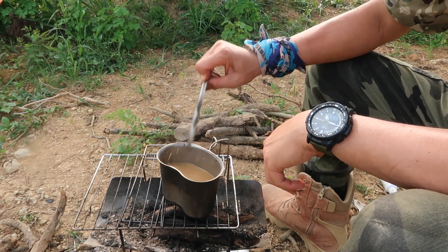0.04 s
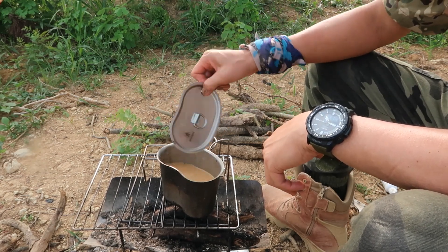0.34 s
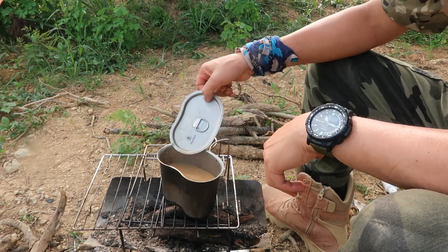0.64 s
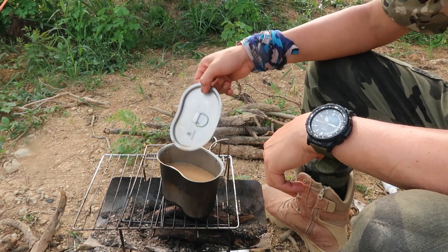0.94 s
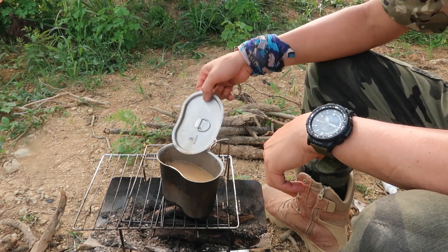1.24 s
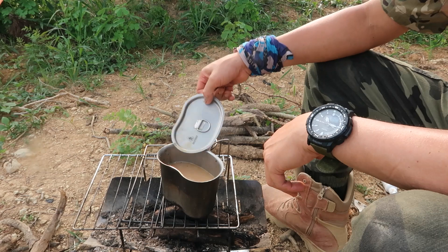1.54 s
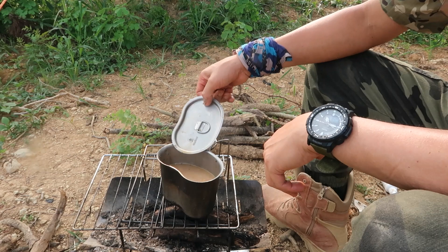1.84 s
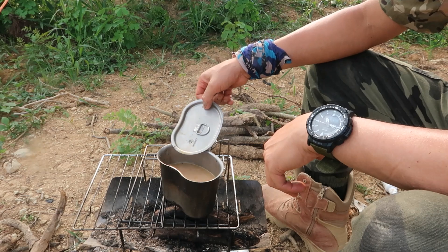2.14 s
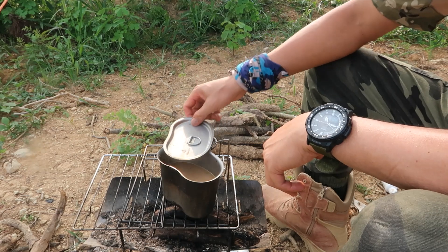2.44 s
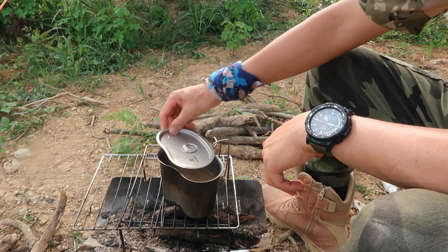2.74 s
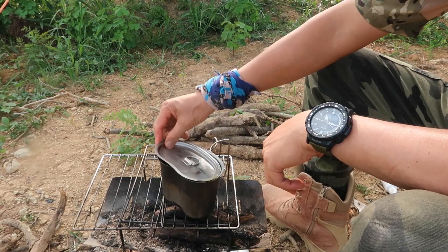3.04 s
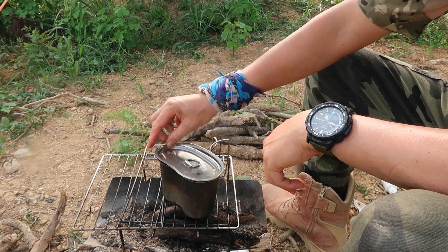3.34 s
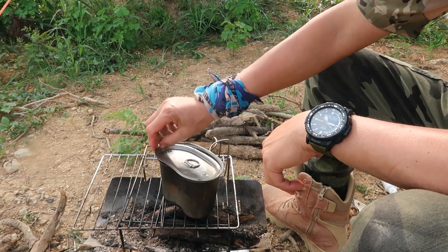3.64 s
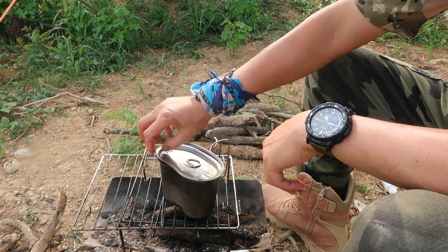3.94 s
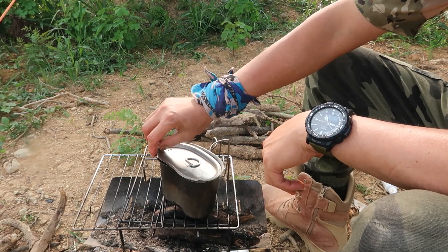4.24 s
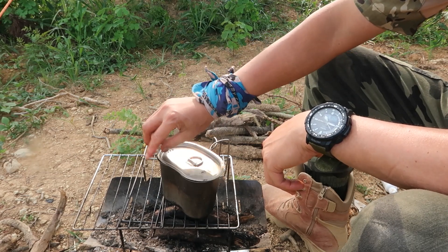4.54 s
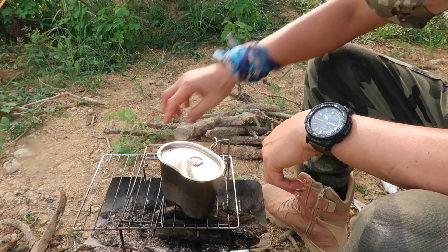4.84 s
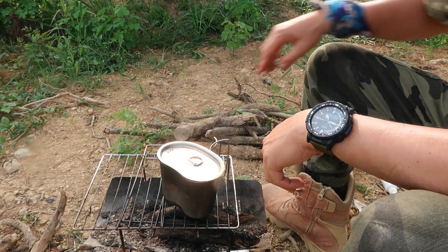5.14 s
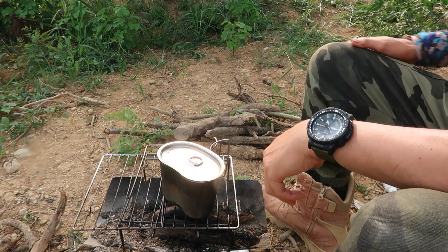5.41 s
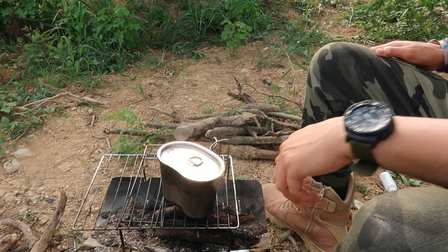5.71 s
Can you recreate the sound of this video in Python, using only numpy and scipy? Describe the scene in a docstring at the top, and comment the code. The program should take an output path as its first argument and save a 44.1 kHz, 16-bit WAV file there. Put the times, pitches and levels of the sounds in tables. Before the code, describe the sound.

Low wind rumbles on the microphone over a steady outdoor hiss throughout. Close by, a thin metal lid is tapped on the rim of a camp cup four times, at about 0.1, 0.5, 1.2 and 1.5 seconds. Each tap is a sharp clink with a short, chattering ring, and faint ticks follow some of them. From about 2 seconds the lid slides across the rim with a rasp and a few brief metallic squeaks, while gusts thump on the microphone until around 3.4 seconds. The lid knocks and scrapes onto the cup between 2.8 and 3.2 seconds, and shifts with lighter knocks near 3.9. From 4.3 to 4.5 seconds it scrapes and clatters shut, its hollow tone falling as the gap closes. From about 5.2 to 5.8 seconds a sleeve rustles softly under a little more wind.

```python
"""Wind rumbles on the microphone over a steady hiss, and at once a thin metal lid is tapped on a camp cup.
Four taps excite its bending modes, each chattering on the rim. The lid slides across with a frictional
rasp, then knocks and scrapes shut; the air resonance beneath it falls as the gap closes.
A sleeve rustles as the arm draws back. Gain control ducks after the loud taps and creeps back."""
import sys
import numpy as np
from scipy import signal
from scipy.fft import rfft, irfft
from scipy.io import wavfile
from scipy.ndimage import uniform_filter1d

SR = 44100
rng = np.random.default_rng(int(sys.argv[2]) if len(sys.argv) > 2 else 0)


def waveform_to_disk(signal):
    """Save audio, clipped to [-1, 1], as 16-bit WAV at the path in sys.argv[1]."""
    frames = np.transpose(np.atleast_2d(signal))
    scaled = np.clip(frames, -1, 1) * 32767
    samples = np.round(scaled).astype(np.int16)
    wavfile.write(sys.argv[1], SR, samples)


N = 254449
TIME = np.arange(N) / SR
RING = TIME[:SR // 3]  # time axis of one transient


def amp(db):
    """Amplitude ratio of a level in decibels."""
    return 10 ** (np.asarray(db) / 20)


def rms(x):
    """Root-mean-square amplitude."""
    return np.sqrt(np.mean(x ** 2) + 1e-20)


def spectrum(points, size):
    """Log-frequency interpolation of a table onto the Fourier bins of size samples."""
    hz, value = np.transpose(points)
    return np.interp(np.log(np.fft.rfftfreq(size, 1 / SR) + 1), np.log(hz + 1), value)


def noise(colour, size):
    """Spectral shaping: Gaussian noise of unit rms from rows of f/Hz, level/dB."""
    x = irfft(rfft(rng.standard_normal(size)) * amp(spectrum(colour, size)), size)
    return x / rms(x)


def add(mix, s, sound):
    """Superposition of a sound on the mix from time s."""
    part = mix[..., max(round(s * SR), 0):][..., :sound.shape[-1]]
    part += sound[..., :part.shape[-1]]


def cut(x, hz, kind, order=4):
    """Causal Butterworth filtering."""
    return signal.sosfilt(signal.butter(order, hz, kind, fs=SR, output="sos"), x)


def resonate(x, hz, width):
    """Forced response of a resonator whose frequency follows the curve hz; bandwidth in Hz."""
    turn = np.exp(2j * np.pi * np.cumsum(hz) / SR)
    pole = np.exp(-np.pi * width / SR)
    return 2 * (turn * signal.lfilter([1 - pole], [1, -pole], x / turn + 1e-18)).real


def clicks(size, per_s, spread_db):
    """Poisson impulses: tiny contacts of uneven force."""
    force = amp(spread_db * np.minimum(rng.exponential(1, size), 3)) * rng.choice([-1, 1], size)
    return force * (rng.random(size) < per_s / SR)


def stroke(s, swell, fade):
    """Gaussian envelope of a hand movement, 20 dB down at times s - swell and s + fade."""
    away = (TIME - s) / np.where(TIME < s, swell, fade)
    return amp(-20 * np.minimum(away ** 2, 10))


# Strength of the breeze: t/s, level/dB
GUSTS = [(0, -48.5), (.65, -52), (1.1, -41.5), (1.6, -45.5), (1.85, -27.5), (1.93, -43), (2.2, -27),
         (2.34, -38.5), (2.86, -30.5), (2.97, -45.5), (3.1, -48.5), (3.23, -23), (3.38, -44), (5.05, -42.5),
         (5.3, -33), (5.46, -43.5), (5.56, -29), (5.77, -48)]
# Spectrum of the turbulent pressure: f/Hz, level/dB
WIND_SPECTRUM = [(12, -32), (20, -4), (49, 5.5), (70, 2), (125, -1), (288, -24), (372, -23.5), (474, -23),
                 (500, -27), (650, -48.5), (1100, -120)]
# Strongest eddies: t/s, level/dB, f/Hz, left minus right/dB
EDDIES = [(1.992, -22, 141, -5.5), (2.123, -24.5, 96, -7), (2.21, -21, 114, -9), (2.553, -25, 85, -4),
          (2.661, -22, 51, 2), (2.716, -25, 63, -4), (2.807, -26.5, 112, 0), (2.858, -21, 95, 3),
          (3.147, -24.5, 68.6, -4.5), (3.203, -18.5, 108, 2), (3.224, -18, 116, -12), (3.298, -26, 69.5, 2),
          (3.326, -19.5, 147, 5.5), (3.744, -30, 55, 2.5), (3.856, -27.5, 71, 1.5), (4.181, -30.5, 63.6, 3),
          (5.25, -26.5, 76, -0.5)]
def wind():
    """Turbulent pressure rumbles and thumps; the smaller the eddy, the less the two ports agree."""
    rumble = cut(noise(WIND_SPECTRUM, N), 590, "low")
    swirl = cut(noise(WIND_SPECTRUM, N), [95, 350], "band", order=2)
    gust = amp(np.interp(TIME, *np.transpose(GUSTS)))
    swirl *= amp(-6.5) * (gust / gust.max()) ** .25
    rumble *= amp(-3) * (gust / gust.max()) ** -.2  # the low rumble swells less steeply than the gusts
    lumps = amp(0.9 * noise([(1, -5), (6, 3.5), (14, -10.5), (40, -40.5), (200, -120)], N))
    out = (rumble + np.array([swirl, -swirl])) * gust * lumps
    ports = np.array([[.5], [-.5]])
    flutter_spectrum = [(60, -6.5), (170, 2.5), (280, -5.5), (450, -30), (900, -78)]
    for s, db, hz, pan_db in EDDIES:
        turns = RING * hz
        lag_rad = min((hz / 95) ** 2, 2.3)
        swell = turns * np.exp(1 - turns / 0.41) / 0.21
        flutter = amp(-12) * np.array([noise(flutter_spectrum, len(RING)) for _ in ports])
        pressure = np.sin(2 * np.pi * turns + ports * lag_rad) + flutter
        add(out, s, amp(db + ports * pan_db) * swell * pressure)
    return out


# Spectrum of the outdoor hiss: f/Hz, level/dB
HISS_SPECTRUM = [(120, -30), (200, -1.5), (299, -6.5), (334, -2.5), (373, -7), (722, -11), (851, -11.5),
                 (1120, -16.5), (1270, -16), (4770, -27), (13300, -41.5), (16000, -71.5)]
# Likeness of left and right: f/Hz, correlation (negative values count as zero)
HISS_CORRELATION = [(60, 0.9), (180, 0.89), (550, 0.81), (1650, 0.65), (4970, -0.059), (15000, -0.78)]
def hiss():
    """Partly coherent noise, wider towards the treble, with a faint narrow-band whine."""
    correlation = np.clip(spectrum(HISS_CORRELATION, N), 0, 1)
    mid, side = (rfft(cut(noise(HISS_SPECTRUM, N), 12500, "low", order=6)) for _ in range(2))
    mid = irfft(mid * np.sqrt((1 + correlation) / 2), N)
    side = irfft(side * np.sqrt((1 - correlation) / 2), N)
    whine = resonate(rng.standard_normal(N), np.full(N, 13050), width=25)
    return amp(-50) * np.array([mid + side, mid - side]) + amp(-84) * whine / rms(whine)


# Spectrum of the metal's dense, short-lived modes: f/Hz, level/dB
CLANG = [(150, -36), (400, -18), (560, -31), (700, -2.5), (850, 4.5), (1200, 0.5), (2300, 3), (3600, -6),
         (4800, -15), (6200, -11), (8500, -27.5), (10500, -17), (13800, -23), (16000, -34.5)]
def metal(modes, clang_db, clang_t60, t60_scale=1):
    """Modal superposition: an impulse response of damped sinusoids over a decaying noisy clang."""
    hz, db, t60 = np.transpose(modes)[:, :, None]
    signs = (-1) ** np.arange(len(hz))[:, None]
    partials = signs * amp(db - 60 * RING / (t60 * t60_scale)) * np.sin(2 * np.pi * hz * RING)
    clang = noise(CLANG, len(RING)) * amp(clang_db - 60 * RING / (clang_t60 * t60_scale))
    return partials.sum(0) + clang


def voiced(x, edges, bands_db, span):
    """Band equalisation: each band of a blow takes its given level over the first span seconds."""
    hz = np.fft.rfftfreq(2 * len(x), 1 / SR)
    lowpasses = [0 * hz] + [1 / (1 + (hz / edge) ** 30) for edge in edges] + [1 + 0 * hz]
    bands = irfft(rfft(x, 2 * len(x)) * np.diff(lowpasses, axis=0))[:, :len(x)]
    early = np.clip((span - RING) * 1000, 0, 1)
    early_rms = np.sqrt(bands ** 2 @ early / early.sum())
    return amp(bands_db) / early_rms @ bands


# Modes of the lid held by its tab: f/Hz, level/dB, T60/s
HELD_MODES = [(447, -21, .1), (748, -13, .09), (907, 1, .24), (1010, -13, .08), (1290, -17, .12),
              (1410, -13, .1), (1522, -2, .14), (1550, -7, .14), (1722, -2, .15), (2168, 2, .14),
              (2355, -6, .11), (2520, -11, .1), (2699, -2, .12), (2797, -3, .1), (3130, -9, .09),
              (3500, -3, .095), (3675, -9, .1), (3945, -5, .085), (4108, -8, .08), (4760, -19, .09),
              (5625, -16, .09), (5860, -17, .09), (6200, -16, .08), (7020, -20, .09), (7905, -21, .09),
              (9720, -22, .08), (11130, -21, .08), (12300, -22, .08), (13610, -16, .08)]
# Bands of a tap: centre f/Hz, level/dB
TAP_BANDS = [(900, -8.5), (1650, -4.5), (2250, -7.5), (2800, -5), (3800, -10), (6500, -19), (11200, -22)]
# Edges between those bands: f/Hz
TAP_EDGES = [1200, 2000, 2500, 3200, 5000, 8500]
# Four taps and two rebounds: t/s, level/dB, tilt/(dB/octave), favoured f/Hz, muted f/Hz, muting/dB,
# bell-tone lift/dB, chatter duration/s, chatter level/dB, chatter decay/(dB/s)
TAPS = [(0.1215, -3.5, -4.5, 1460, 2750, 14, 1, 0.041, -9.5, 286),
        (0.451, -11, -0.2, 2720, 2180, 1.5, -3.5, 0.044, -5, 205),
        (0.523, -27, 1, 2800, 2170, -2, -5, 0.016, 9, 152),
        (1.1654, -4.5, 2, 2224, 1300, 4, 1, 0.051, -5, 199),
        (1.229, -16.5, -0.8, 2230, 1300, 5, -3, 0.042, -13, 196),
        (1.5397, -1, 1.5, 2240, 2880, 1.5, -3, 0.073, -11.5, 120)]
def taps():
    """Impact excitation: the contact point favours one pitch and mutes another; the lid then chatters."""
    out = np.zeros(N)
    centre_hz, colour_db = np.transpose(TAP_BANDS)
    hz, mode_db, t60 = np.transpose(HELD_MODES)
    bell_hz, reach_octaves = 907, 0.19  # lowest strong mode; reach of favouring and muting
    for s, db, tilt, favoured_hz, muted_hz, muting_db, bell_db, length, chatter_db, decay in TAPS:
        grip = 1 + rng.uniform(-.001, .003, len(hz))  # the fingers detune the modes
        boost_db = 5 * np.exp(-((hz - favoured_hz) / 70) ** 2) + bell_db * (hz == bell_hz)
        modes = np.column_stack([hz * grip, mode_db + boost_db, t60])
        cutoff = np.exp(-np.maximum(RING - length, 0) / 0.013)  # the buzzing ring cuts off quickly
        contacts = clicks(len(RING), per_s=1500, spread_db=2) * cutoff * amp(chatter_db - decay * RING)
        damped = metal(modes, clang_db=7.5, clang_t60=0.038, t60_scale=0.34)  # contact deadens the metal
        chatter = amp(-10) * signal.fftconvolve(contacts, damped)[:len(RING)]
        crack = noise(CLANG, len(RING)) * amp(13 + 0.5 * db - 60 * RING / 0.011)  # hard blows crack more
        blow = crack + metal(modes, clang_db=7.5, clang_t60=0.025, t60_scale=0.74) + chatter
        blow *= 1 - np.exp(-RING / (.0003 * amp(-.55 * db)))  # a light rebound builds up more slowly
        favoured = np.exp(-(np.log2(centre_hz / favoured_hz) / reach_octaves) ** 2)
        muted = np.exp(-(np.log2(centre_hz / muted_hz) / reach_octaves) ** 2)
        bands_db = db + colour_db + tilt * np.log2(centre_hz / 2000) + 3.5 * favoured - muting_db * muted
        add(out, s, voiced(cut(blow, 440, "high", order=2), TAP_EDGES, bands_db, span=0.0083))
    return out


# Modes of the lid's wire tab: f/Hz, level/dB, T60/s
TAB_MODES = [(2330, 0, .12), (2376, -3, .09), (2940, -6.5, 0.096), (3600, -11.5, .06), (6090, -7.5, 0.054),
             (6350, -14, .05)]
# Ticks of the tab: t/s, peak level/dB
TICKS = [(0.196, -30.5), (1.3054, -38.5), (1.374, -38.5), (1.4424, -43.5), (1.675, -38), (1.7384, -40.5)]
def tab_ticks():
    """Free vibration of the wire tab after light contacts."""
    out = np.zeros(N)
    for s, db in TICKS:
        tick = cut(metal(TAB_MODES, clang_db=5.5, clang_t60=.04), 7500, "low")
        tick *= 1 - np.exp(-RING / 0.0019)
        add(out, s, amp(db) * tick / abs(tick).max())
    return out


def friction(body):
    """Convolution of slipping contacts with an impulse response: lower band and treble, unit rms each."""
    x = signal.fftconvolve(clicks(N, per_s=1800, spread_db=4), body)[:N]
    low, high = cut(x, 3960, "low"), cut(x, 4800, "high")
    return low / rms(low), high / rms(high)


# Spectrum of edge rubbing on rim: f/Hz, level/dB
RASP = [(400, -36), (900, -2), (1500, -7), (2200, 5), (3000, -3.5), (3700, -10), (4100, -11), (4600, -20),
        (5500, -31), (6200, -7.5), (8000, -24.5), (13500, -19), (16000, -33)]
# Resonances of the rim: f/Hz, bandwidth/Hz, level re rasp/dB
RIM_TONES = [(920, 45, 0), (1290, 40, -5), (1673, 79, -5.5), (2110, 120, -2), (3140, 760, -12),
             (4070, 83, -15)]
# Gliding strokes: peak t/s, swell/s, fade/s, level/dB
SLIDES = [(.66, .12, 0.084, -56), (0.869, 0.037, 0.043, -53.5), (2.03, 0.049, 0.066, -56.5),
          (2.19, 0.077, 0.12, -55.5), (2.369, 0.17, 0.13, -41), (2.76, 0.2, 0.13, -47.5)]
def slides():
    """Sliding friction: the gliding edge rasps and drives the resonances of the rim."""
    contact = noise(RASP, len(RING)) * amp(-60 * RING / 0.025)
    rasp, treble = friction(contact + amp(-34.5) * metal(HELD_MODES, clang_db=7.5, clang_t60=0.028))
    rubbing = rasp + amp(-25) * treble
    for hz, width, db in RIM_TONES:
        steady = np.full(N, hz)
        tone = resonate(resonate(rng.standard_normal(N), steady, width), steady, width)
        rubbing += amp(db) * tone / rms(tone)
    return rubbing * sum(amp(db) * stroke(s, swell, fade) for s, swell, fade, db in SLIDES)


# Catches of the edge: peak t/s, duration/s, f/Hz, level/dB
SQUEALS = [(2.18, .09, 931, -49), (2.3, .13, 920, -39), (2.354, .13, 1290, -46.5),
           (2.403, 0.13, 2110, -36.5), (2.418, 0.077, 920, -49), (2.721, 0.102, 927, -46.5),
           (2.777, 0.058, 1700, -38)]
def squeals():
    """Friction-induced oscillation: where the edge catches, one rim tone swells and wavers."""
    out = np.zeros(N)
    for s, length, hz, db in SQUEALS:
        arch = np.hanning(round(length * SR))
        waver = 1 + 0.014 * noise([(20, 0), (150, -4), (600, -40), (2000, -96)], len(arch))
        tone = np.sqrt(2) * np.sin(2 * np.pi * np.cumsum(hz * waver) / SR)
        add(out, s - length / 2, amp(db) * arch * tone)
    return out


# Modes of the lid lying on the cup: f/Hz, level/dB, T60/s
SEATED_MODES = [(1040, -12, .05), (1320, -9, .06), (1615, -2, .07), (1740, -4, .07), (1835, -4, .07),
                (2020, -4, .06), (2220, -3, .06), (2360, -7, .06), (2690, -1, .07), (2775, -1, .06),
                (3330, -8, .055), (3480, -7, .055), (3950, -21, .04), (4370, -21, .04), (5875, -9, .06),
                (6020, -17, .05), (7030, -22, .05), (9700, -22, .05), (12900, -25, .05)]
# Metal bands above the air resonance: centre f/Hz, level/dB, factor on the added treble
KNOCK_BANDS = [(1700, -2, 0), (3300, 1, 0.55), (6000, -17, 0.53), (9500, -24.5, 1.1)]
# Lower edges of those bands: f/Hz
KNOCK_EDGES = [1200, 2400, 4500, 7500]
# Steps of the lid into its seat: t/s, air resonance f/Hz, air level/dB, metal level/dB, added treble/dB
KNOCKS = [(2.836, 911, -12.5, -20.5, 1), (2.857, 944, -19.5, -34.5, 7), (2.873, 920, -22.5, -32, -3),
          (2.946, 923, -24.5, -38, -10), (3.084, 851, -26.5, -36, -22), (3.173, 776, -27, -40, -5),
          (3.797, 844, -46.5, -60, -6), (3.835, 848, -34, -44, -12), (3.869, 830, -30, -39, -13),
          (3.918, 800, -23, -32.5, -14), (4.187, 757, -44.5, -54.5, -1), (4.259, 778, -35.5, -55, -2),
          (4.425, 867, -20.5, -23, -10), (4.443, 880, -22.5, -30, 3), (4.463, 803, -19, -23.5, -4),
          (4.507, 713, -21.5, -21.5, 6.5), (4.518, 550, -26.5, -24.5, 1)]
def knocks():
    """Impacts ring the metal and the air cavity beneath; damping grows as the lid is pressed home."""
    out = np.zeros(N)
    t60_scales = np.linspace(1, .6, len(KNOCKS))
    for (s, air_hz, air_db, metal_db, treble_db), t60_scale in zip(KNOCKS, t60_scales):
        seating = 1 + rng.uniform(-.012, .012, len(SEATED_MODES))  # the lid never lies the same way twice
        air_modes = [(air_hz, 9, .08), (air_hz * 0.87, -3, .04)]
        lid_modes = [(hz * detune, db, t60) for (hz, db, t60), detune in zip(SEATED_MODES, seating)]
        blow = metal(air_modes + lid_modes, clang_db=6, clang_t60=0.035, t60_scale=t60_scale)
        bands_db = [air_db] + [metal_db + db + share * treble_db for _, db, share in KNOCK_BANDS]
        add(out, s, voiced(cut(blow, 485, "high", order=3), KNOCK_EDGES, bands_db, span=0.0081))
    return out


# Strokes of the lying lid: peak t/s, swell/s, fade/s, rasp level/dB, treble level/dB, air level/dB
SCRAPES = [(2.864, 0.071, 0.063, -29.5, -54, -32.5), (2.927, 0.024, 0.026, -29, -42, -30),
           (2.975, 0.056, 0.11, -34.5, -62.5, -34), (3.134, 0.066, 0.047, -35.5, -56, -29),
           (3.866, 0.053, 0.048, -44, -78, -36.5), (4.352, 0.1, 0.077, -33, -51, -33),
           (4.459, 0.036, 0.046, -27.5, -42, -42), (4.516, 0.03, 0.045, -22, -40, -24)]
def scrapes():
    """Stick-slip friction drives the lying lid and the air resonance, which falls as the gap narrows."""
    contact = noise(RASP, len(RING)) * amp(-60 * RING / 0.022)
    rasp, _ = friction(contact + amp(-2) * metal(SEATED_MODES, clang_db=12.5, clang_t60=0.031))
    _, treble = friction(metal(SEATED_MODES, clang_db=-2.5, clang_t60=0.049))
    # comb filtering: as the contact travels, the wave reflected from the edge arrives sooner or later
    lag_s = 0.001585 + 0.00022 * noise([(1, 4), (5, -6.5), (15, -48), (100, -140)], N)
    rasp += .5 * np.interp(TIME - lag_s, TIME, rasp)
    grit = amp(1.14 * noise([(10, -28), (40, 16), (150, 12), (400, -31), (1500, -86)], N))
    knock_s, knock_hz, *_ = np.transpose(KNOCKS)
    air_hz = np.interp(TIME, knock_s, knock_hz)
    air = resonate(resonate(clicks(N, per_s=2000, spread_db=3), air_hz, width=118), air_hz, width=133)
    layers = np.array([rasp, treble, air / rms(air)])
    return grit * sum(stroke(s, swell, fade) * (amp(dbs) @ layers) for s, swell, fade, *dbs in SCRAPES)


# Spectrum of rubbing cloth: f/Hz, level/dB
SLEEVE_SPECTRUM = [(410, -35), (700, -8), (1350, -13), (1480, -15.5), (2840, -9.5), (6230, -21),
                   (13300, -34.5), (16000, -48)]
# Brushes of the sleeve: peak t/s, swell/s, fade/s, level/dB
BRUSHES = [(5.38, .2, .35, -54), (5.61, .05, 0.075, -59.5), (5.76, 0.084, .07, -57.5)]
def sleeve():
    """Friction noise of cloth, amplitude-modulated by its folds."""
    folds = amp(1.7 * noise([(5, -4), (60, -11), (300, -49), (1000, -95)], N))
    cloth = np.array([noise(SLEEVE_SPECTRUM, N) for _ in range(2)]) * folds
    return cloth * sum(amp(db) * stroke(s, swell, fade) for s, swell, fade, db in BRUSHES)


def scattered(x, t60):
    """Diffuse reflection from ground and grate: convolution with a short, dense tail of unit energy."""
    tail = rng.standard_normal(len(RING)) * amp(-60 * RING / t60)
    return signal.fftconvolve(x, tail / np.linalg.norm(tail))[:N]


# Stereo width of the metal sounds: f/Hz, side level re mid/dB
METAL_WIDTH = [(500, -21.5), (1500, -46), (2600, -38), (4000, -10), (7000, -2.5), (13000, -5)]
def with_reflections(direct):
    """Scattering adds a faint tail and decorrelates the treble between the ears."""
    mid = direct + amp(-31) * cut(scattered(direct, t60=0.29), 3500, "low", order=2)
    side = irfft(rfft(scattered(mid, t60=.03)) * amp(spectrum(METAL_WIDTH, N)), N)
    return np.array([mid + side, mid - side])


def scene():
    """Linear superposition of lid, wind, hiss and sleeve."""
    impacts = taps() + tab_ticks() + knocks()
    rubbing = slides() + squeals() + scrapes()
    return with_reflections(impacts + rubbing) + wind() + hiss() + sleeve()


def record(dry):
    """Automatic gain control with fast attack and slow release, then soft clipping and a band limit."""
    threshold_db, duck_share, release_db_per_s, edge_hz = -10.5, 0.7, 7, 15900
    power_db = 10 * np.log10(abs(uniform_filter1d((dry ** 2).mean(0), size=176)) + 1e-12)
    wanted_db = duck_share * np.maximum(power_db - threshold_db, 0)
    release_db = release_db_per_s * TIME
    duck_db = np.maximum.accumulate(wanted_db + release_db) - release_db
    ducked = dry * amp(-uniform_filter1d(duck_db, size=64))
    rounded = ducked / (1 + (ducked / .95) ** 6) ** (1 / 6)
    lowpass = signal.firwin(255, edge_hz, window=("kaiser", 9), fs=SR)
    return signal.oaconvolve(rounded, lowpass[None], "same")


dry = scene()
out = record(dry)
waveform_to_disk(out)
```